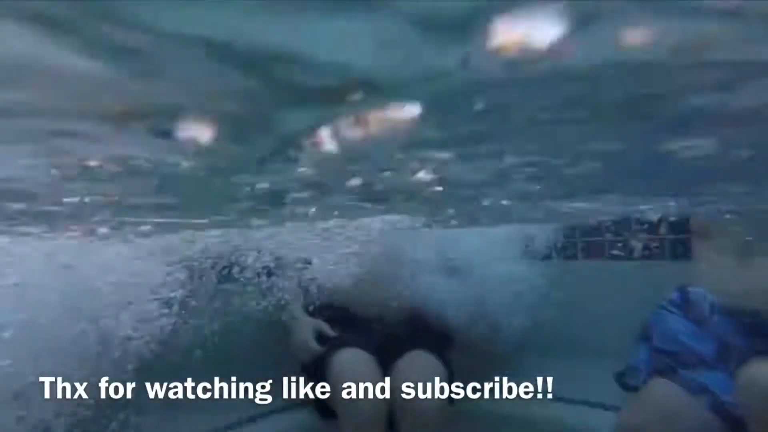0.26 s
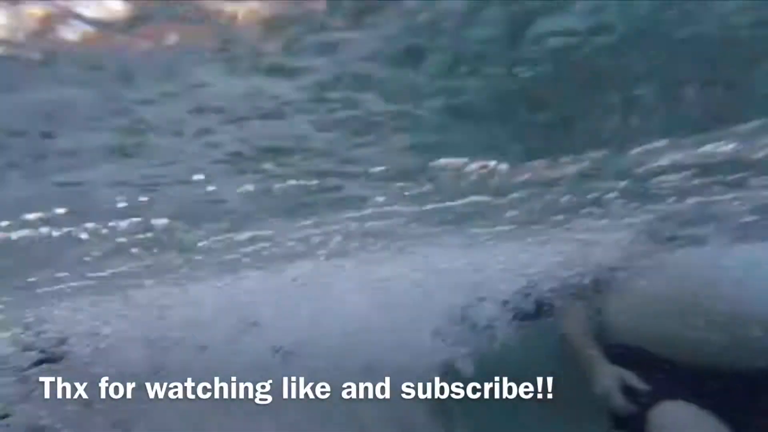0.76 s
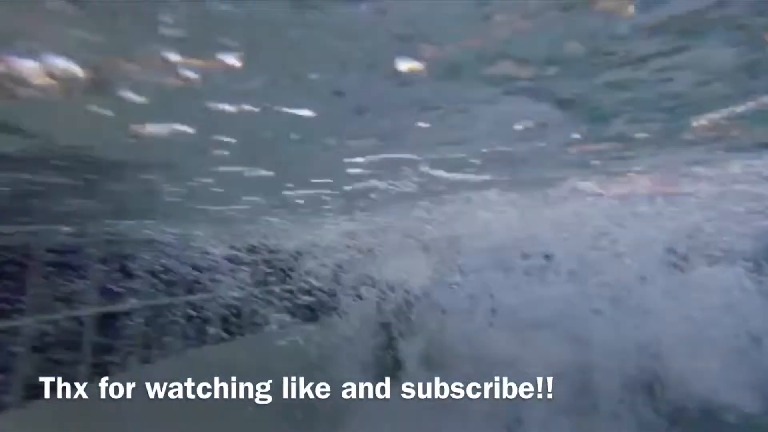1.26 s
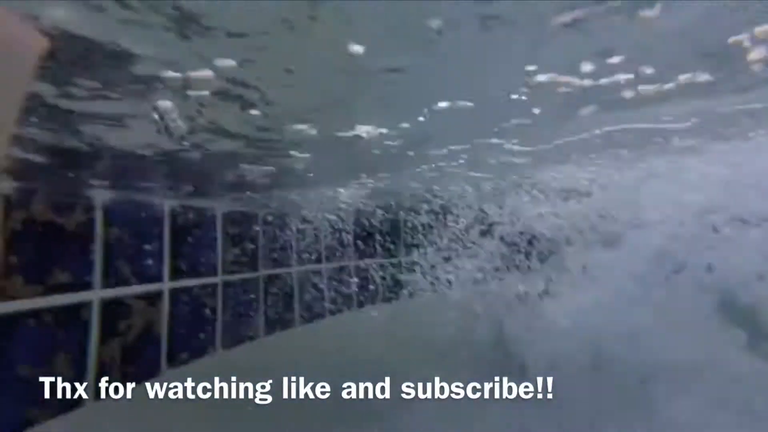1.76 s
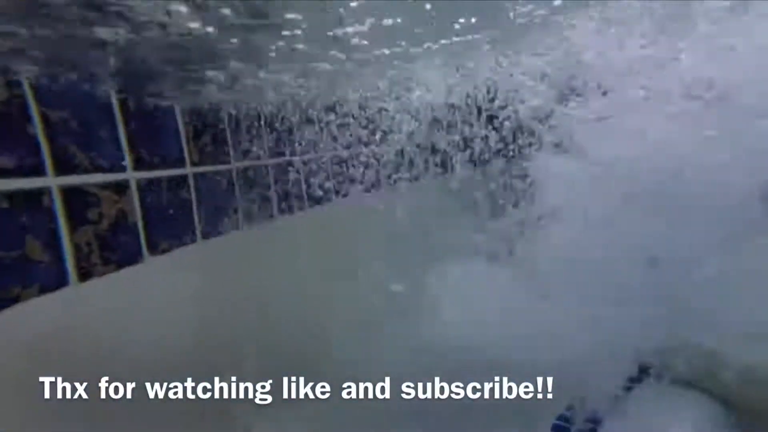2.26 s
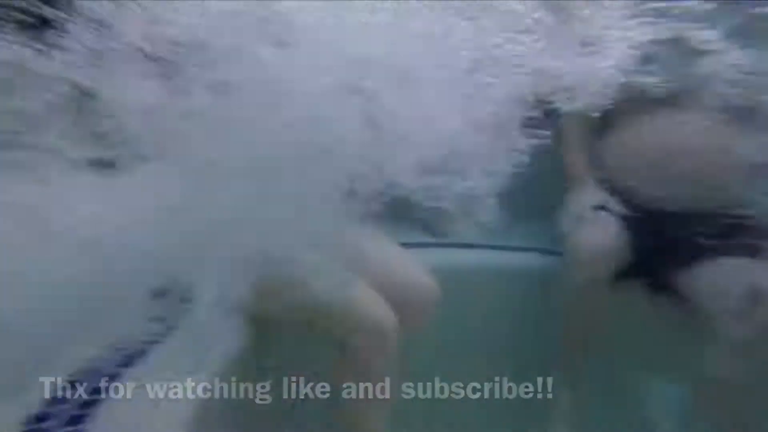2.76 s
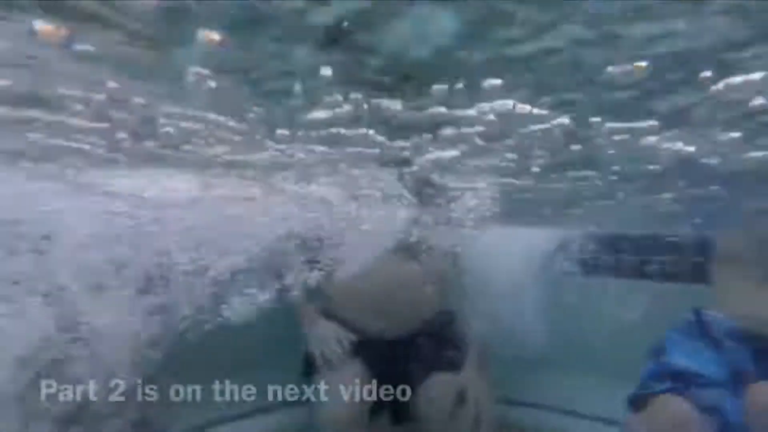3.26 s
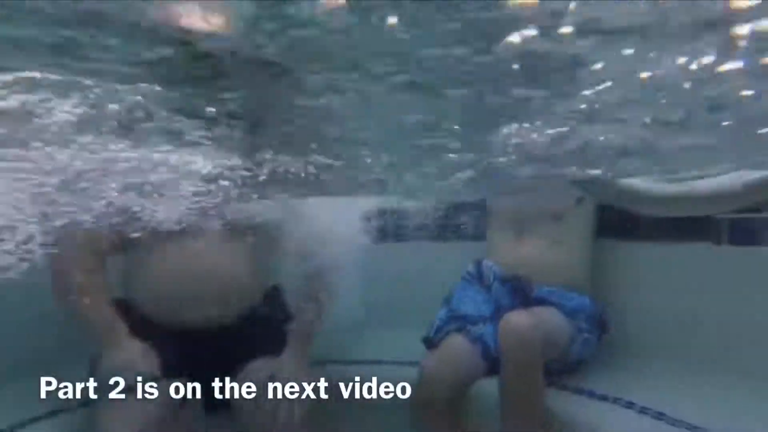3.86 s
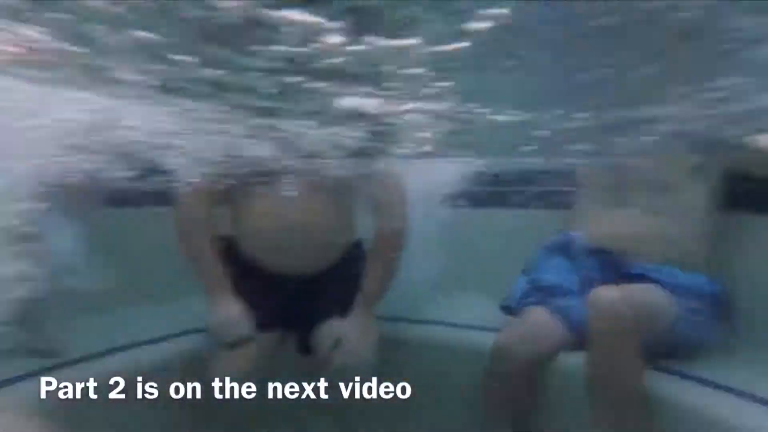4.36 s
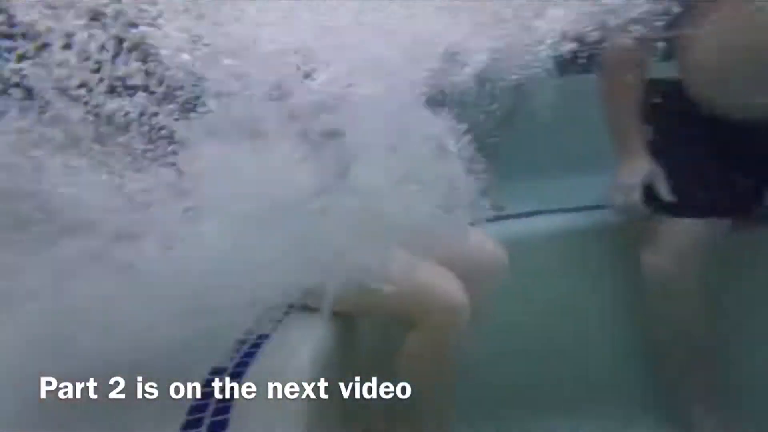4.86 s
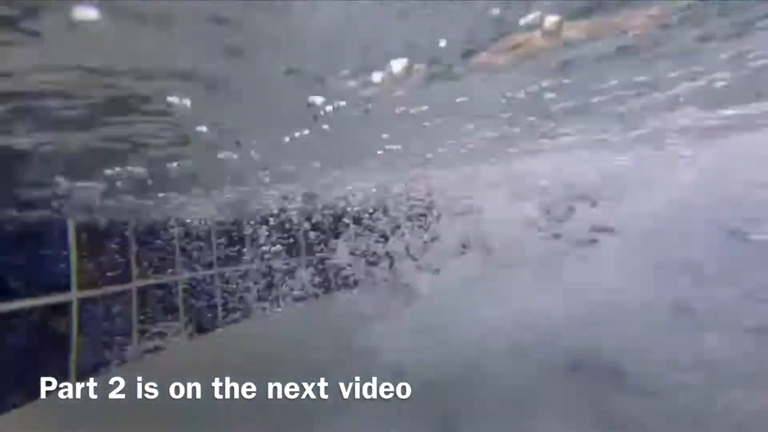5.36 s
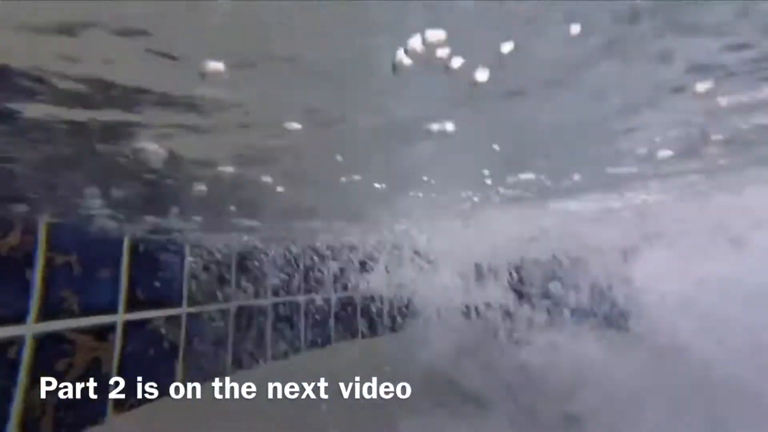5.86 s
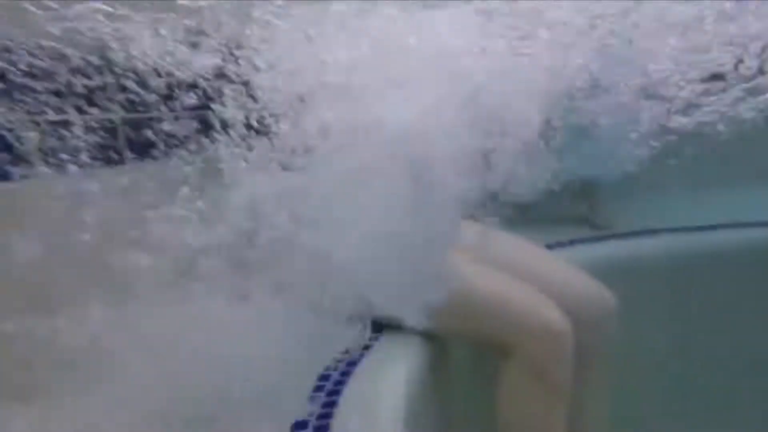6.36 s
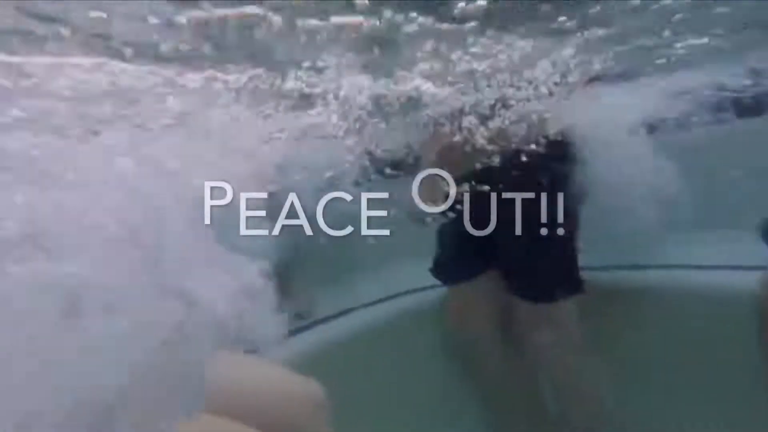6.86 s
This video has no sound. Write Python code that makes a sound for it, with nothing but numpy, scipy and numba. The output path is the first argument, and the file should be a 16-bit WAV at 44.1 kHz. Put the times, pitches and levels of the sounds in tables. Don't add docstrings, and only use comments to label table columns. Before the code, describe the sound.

A microphone plunges with a crackling slap into a hot tub, then hears steady muffled underwater rumble, bubbling churn and small knocks.

```python
import sys
import numpy as np
from scipy import signal
from scipy.fft import rfft, irfft, next_fast_len
from scipy.io import wavfile
from scipy.ndimage import uniform_filter1d, minimum_filter1d
from numba import njit

SR = 44100
rng = np.random.default_rng(int(sys.argv[2]) if len(sys.argv) > 2 else 0)


def linear_from_db(decibels):
    return 10 ** (np.asarray(decibels, float) / 20)


def dump_mix(stems):
    frames = np.atleast_2d(stems).T
    limited = np.clip(frames, -1, 1)
    pcm = np.round(limited * 32767).astype(np.int16)
    wavfile.write(sys.argv[1], SR, pcm)


N = 314342
RING_HZ = 1130.0


def curves(*tables):
    s, *columns = np.vstack(tables).T
    return [np.interp(np.arange(N) / SR, s, c) for c in columns]


def swells(s, db, half_s):
    t = np.arange(0, N + 64, 64) / SR
    bells = db * np.exp(-((t[:, None] - s) / half_s) ** 2)
    return np.interp(np.arange(N) / SR, t, bells.sum(axis=1))


def colour(x, points):
    hz, db = np.transpose(points)
    size = next_fast_len(N)
    f = np.arange(size // 2 + 1) * SR / size + 1
    gain = linear_from_db(np.interp(np.log(f), np.log(hz), db, -140, -140))
    y = irfft(rfft(x, size) * gain, size)[:N]
    return y / np.std(y)


def walk(rate):
    k = int(SR / rate)
    steps = np.repeat(rng.standard_normal(N // 100), k)[:N]
    return 0.81 * uniform_filter1d(uniform_filter1d(steps, k), k)


@njit
def svf(x, hz, width_hz):
    y, b, l = np.empty(len(x)), 0., 0.
    for i in range(len(x)):
        g, k = np.tan(np.pi * hz[i] / SR), width_hz / hz[i]
        v = (b + g * (x[i] - l)) / (1 + g * (g + k))
        b, l, y[i] = 2 * v - b, l + 2 * g * v, k * v
    return y


def fixed_band(x, hz, width_hz):
    return svf(x, np.full(N, hz), width_hz)


@njit
def rings(length, s, hz, t60, size, glide):
    y = np.zeros(length)
    for e in range(len(s)):
        start, n = int(s[e] * SR), int(t60[e] * SR * .8) + 1
        z, swell = size[e] + 0j, 1.
        p = np.exp(2j * np.pi * hz[e] / SR - np.log(1000) / (t60[e] * SR))
        turn = np.exp(2j * np.pi * hz[e] * glide / SR / n)
        for i in range(start, min(start + n, length)):
            y[i] += z.imag * (1 - swell) ** 2
            swell *= 1 - 2 * hz[e] / SR
            z *= p
            p *= turn
    return y


def saturate(x, share):
    envelope = np.abs(signal.hilbert(x, next_fast_len(N))[:N])
    return x / envelope ** share


def under():
    return np.clip((np.arange(N) / SR - 0.195) / 0.012, 0, 1)


# (time [s], churn level [dB], share of the shell wrapped in foam [0-1])
JETS = [(0, -28.5, 0.9), (.2, -33, 0.28), (.32, -29, 0.18), (.7, -27, 0.17), (.9, -33, 0.14),
        (1.36, -28.5, 0.17), (1.6, -26.5, 0.1), (2.3, -19.5, 0.18), (2.64, -25, 0.11), (3.1, -20, 0.16),
        (3.4, -26, 0.11), (3.95, -20, 0.12), (4.47, -25, 0.17), (5.1, -19.5, 0.12), (5.27, -22.5, 0.38),
        (5.45, -18, 0.74), (5.56, -21.5, 0.23), (7.13, -20.5, 0.29)]
# (time [s], rise [dB], half length [s])
GUSHES = [(0.49, -0.5, 0.051), (0.63, 3, 0.041), (0.998, 0.5, 0.043), (1.367, -1.5, 0.049),
          (0.822, 6, 0.063), (1.104, 2.5, 0.031), (1.255, 2.5, 0.033), (1.554, 1.5, 0.029),
          (1.794, 2.5, 0.048), (1.925, -1.5, 0.051), (1.996, 3, 0.031), (2.945, 3.5, 0.05),
          (2.926, 0, 0.018), (3.082, 0.5, 0.032), (3.2, 3, 0.023), (5.417, -2, 0.042), (3.527, 4, 0.042),
          (3.981, 3.5, 0.017), (4.073, -2.5, 0.067), (4.274, 3.5, 0.023), (4.944, 1, 0.093),
          (5.056, -5, 0.061), (5.616, 2.5, 0.075), (5.894, -2.5, 0.096), (6.074, 1.5, 0.071),
          (6.25, 2, 0.026), (6.7, -3, 0.14), (6.756, 4, 0.051), (7.006, 2, 0.039)]
# (offset [dB], share of churn change [1], foam effect [dB per full foam],
# foam share beyond which nothing changes [1], share of gush [1])
FOLLOW = [
    (0, 0.81, -1.95, 1.2, 0.86),
    (5.5, 0.74, -32, 1.2, 1.4),
    (-21, 0.73, 2.5, 1.2, 1.2),
    (-52.5, .4, 4.5, 1.2, .25),
    (-34, 0.67, 55, 0.27, 0.2),
]


def layer_db():
    mid_db = -24
    churn_db, foam = curves(JETS)
    gush_db = swells(*np.transpose(GUSHES))
    return [mid_db + db + share * (churn_db - mid_db) + foam_db * np.minimum(foam, full) + gush * gush_db
            for db, share, foam_db, full, gush in FOLLOW]


# (time [s], rise [dB], half length [s])
LEAKS = [(0.202, 20, .01), (0.227, 7, .02), (0.349, 21, 0.064), (0.443, 13, 0.034), (0.614, 12.5, 0.058),
         (.85, 13, .05), (1.126, 28, .02), (1.547, 20.5, .03), (2.101, 19.5, .02), (3.07, 8, 0.054),
         (3.459, 4, .02), (4.873, 17, 0.01), (4.994, 12, 0.017), (5.114, 6, 0.046), (5.58, 10.5, 0.035),
         (6.081, 7, .025)]
# (time [s], pitch [Hz], level [dB])
PINCH = [
    (5.0, 1350, -70),
    (5.05, 1392, -37.5),
    (5.1, 1433, -38),
    (5.145, 1546, -39),
    (5.18, 1400, -40),
    (5.23, 1340, -68),
]


def pocket():
    grain = rng.standard_normal(N) * linear_from_db(0.9 * walk(44))
    hz, pinch_db = curves(PINCH)
    pinch = svf(svf(grain, hz, 220.), hz, 220.)
    band = colour(grain, [(1330, -19.0), (1420, -0.5), (1520, -6.5), (1650, -10.5), (1800, -26)])
    leak_db = layer_db()[-1] + swells(*np.transpose(LEAKS)) - 5.5
    return linear_from_db(pinch_db) * pinch / np.std(pinch) + band * linear_from_db(leak_db) * under()


# (frequency [Hz], density [dB per Hz])
SPRAY_COLOUR = [(2500, -22), (4000, -17), (5000, -13), (6200, -1.5), (7200, 3.5), (8000, -1), (8800, 1),
                (10500, -5), (10900, -20.5), (11400, -43.5)]
# (frequency [Hz], density [dB per Hz])
SPLASH_COLOUR = [(80, -9.5), (250, 5), (1000, 2), (1600, -10.5), (2500, -10.5), (3500, -26.5), (5000, -53)]
# (start [s], length [s], level [dB], brightness [dB])
SPLASH = [
    (0.151, 0.032, -12, -41),
    (0.184, 0.0053, -18, -45),
    (0.313, 0.087, -28.5, -45),
    (0.386, 0.027, -19, -47),
    (0.762, 0.12, -21.5, -41),
    (0.835, 0.04, -28.5, -34),
    (1.044, 0.087, -28.5, -39),
    (4.224, 0.045, -35, -46),
]


def splash():
    t = np.arange(N) / SR
    grain = rng.standard_normal((2, N)) * linear_from_db(1.9 * walk(400))
    dull, bright = colour(grain[0], SPLASH_COLOUR), colour(grain[1], SPRAY_COLOUR)
    body = signal.sosfiltfilt(signal.butter(2, 900, fs=SR, output="sos"), dull)
    dull = dull - 0.41 * under() * body
    total = np.zeros(N)
    for s, length, db, bright_db in SPLASH:
        burst = np.sin(np.pi * np.clip((t - s) / length, 0, 1) ** 2.0)
        total += burst * linear_from_db(db) * (dull + linear_from_db(bright_db) * bright)
    return total


# (time [s], level [dB])
AIR = [
    (0, -37),
    (.1, -41.5),
    (.15, -38.5),
    (.178, -38),
    (.186, -83.5),
    (.2, -120),
]
# (frequency [Hz], density [dB per Hz])
AIR_COLOUR = [(250, -9), (400, 7.5), (900, -4), (1600, 7.5), (3000, -5), (4300, -11), (5200, -4),
              (7000, -4.5), (8500, -6), (9500, -15.5), (12000, -36.5), (16000, -56)]
# (time [s], pressure jump [full scale], rise [s])
PLUNGE = [(0.145, .4, .0062), (.1585, -.15, .002), (.162, .85, .0025), (.165, -.5, .002), (.1677, .4, .001),
          (.169, -1.1, .0017), (.1707, .6, .001), (.172, .8, .002), (.1745, -.6, .002), (.1773, .7, .001),
          (.1805, -.6, .004), (.1897, -.9, .0012), (.191, .7, .0013), (.1928, -.7, .003)]


def plunge():
    t = np.arange(N) / SR
    fizz = colour(rng.standard_normal(N) * linear_from_db(1.1 * walk(110)), AIR_COLOUR)
    gap = svf(rng.standard_normal(N), np.interp(t, [0, .08, .16], [9000., 9600., 10800.]), 1000.)
    pressure = np.zeros(N)
    for s, jump, rise in PLUNGE:
        pressure += 1.35 * jump * np.sin(np.pi / 2 * np.clip((t - s) / rise, 0, 1)) ** 2
    vent_s = 0.01
    leaked = signal.lfilter([1, -1], [1, -np.exp(-1 / (vent_s * SR))], pressure)
    crack_s, crack_db, crack_t60_s = .1783, -6, .004
    snap = linear_from_db(crack_db - 60 * np.abs(t - crack_s) / crack_t60_s)
    crack = rng.standard_normal(N) * (t > crack_s) * snap
    crack = signal.sosfilt(signal.butter(2, 3000, fs=SR, output="sos"), crack)
    return crack + (fizz + gap) * linear_from_db(curves(AIR)[0]) + leaked


# (time [s], peak [dB], pitch [Hz], ring T60 [s])
KNOCKS = [(0.1406, -9.5, 1050, 0.012), (0.1565, 5.5, 600, 0.007), (.1665, 9, 900, .008),
          (0.1645, -7, 1500, .006), (0.168, -5, 2600, .006), (0.174, -1, 2100, .006),
          (0.178, 9, 1670, 0.0052), (0.186, 4, 1430, 0.013), (0.1877, -1, 1250, 0.0095),
          (0.254, -3.5, 1470, 0.013), (.307, -16, 1290, 0.026), (0.4063, -11, 2260, .012),
          (.409, -8.5, 1350, 0.017), (0.8495, -18, 2000, .012), (1.1174, -16, 1480, .012),
          (1.124, -17, 1850, .008), (1.132, -17, 1660, .009), (1.139, -28, 1900, .008),
          (1.538, -28, 1720, 0.0134), (2.105, -19, 1497, .008), (2.108, -18, 1900, .008),
          (2.811, -21, 2704, 0.01), (2.8366, -12.5, 2560, 0.012), (2.837, -17, 1900, .008),
          (3.19, -24, 2040, 0.013), (3.463, -27, 1500, 0.016), (4.8784, -19, 1546, .017),
          (6.079, -27, 1600, .014)]
# (time [s], peak [dB], pitch [Hz])
BUMPS = [(0.37, -10, 201), (0.4, -10, 209), (0.572, -14, 191), (.655, -25, 170), (0.721, -9.5, 160),
         (0.87, -1, 203), (.97, -21, 193), (1.106, -14, 197.2), (1.134, -12.5, 198), (1.18, -19, 200),
         (2.12, -5, 162), (2.693, -3, 172.5), (3.04, -5.5, 201.5), (3.067, -5.5, 150), (3.172, -21, 194.2),
         (3.78, -18, 183), (4.259, -4.5, 146), (4.293, 1.5, 138), (4.65, -3.5, 145), (5.018, -4.5, 164.3),
         (5.609, -17, 144), (5.938, -11, 148), (6.079, -18, 142), (6.516, -10, 281)]
# (time [s], peak [dB], pitch [Hz])
PINGS = [(0.5004, -12.5, 1200), (0.66, -12.5, 1140), (0.714, -10, 1123), (0.7782, -10.5, 1094),
         (0.8207, -20, 1160), (1.7212, -20, 1097), (1.8634, -16, 1130), (1.907, -14, 1165),
         (1.9646, -14, 1109), (1.997, -14, 1114), (2.1511, -11.5, 1130), (2.2147, -11.5, 1110),
         (2.2631, -15, 1154), (2.3275, -6, 1163), (2.392, -10, 1130), (2.4916, -9.5, 1090),
         (2.5271, -16, 1084), (2.6444, -13, 1140), (2.801, -13, 1130), (2.8675, -15, 1210),
         (2.906, -7.5, 1123), (2.9953, -14, 1130), (3.0786, -12, 1120), (3.1018, -20, 1150),
         (3.178, -16, 1120), (3.2547, -10, 1110), (3.4966, -6, 1130), (3.5753, -11, 1130),
         (3.6974, -6.5, 1113), (3.746, -15, 1111), (4.0696, -11.5, 1130), (4.146, -13, 1130),
         (4.1891, -17.5, 1110), (4.2702, -10, 1090), (4.774, -13.5, 1136), (4.954, -13.5, 1140),
         (5.6443, -11.5, 1034), (5.7833, -14.5, 1130), (5.8724, -18, 1072), (5.9, -9.5, 1064),
         (6.0058, -15.5, 1150), (6.0704, -13.5, 1130), (6.0923, -13, 1070), (6.2594, -17, 1147),
         (6.4231, -14, 1105), (6.465, -15.5, 1123), (6.5167, -17.5, 1084), (6.547, -18, 1150),
         (6.591, -14, 1122), (6.752, -14, 1120), (6.764, -13, 1120), (6.8906, -15, 1120),
         (6.9552, -15.5, 1105), (7.037, -15, 1140)]
# (time [s], peak [dB], pitch [Hz])
TICKS = [(.01, -41, 8800), (.016, -41, 4500), (.132, -43, 8500), (.138, -43, 7500), (.146, -39, 7000),
         (.165, -38, 4500), (.178, -25, 4500), (.1788, -44, 7300), (.192, -51, 8000), (.1578, -30, 3000),
         (.1578, -36, 5000), (.169, -30, 3400), (.1782, -17, 3000), (.1782, -25, 5800), (.203, -37, 3200),
         (.212, -43, 3300), (.2205, -49, 7000), (.221, -45, 3200), (.228, -44, 2700), (.363, -50, 7500),
         (.370, -49, 7000), (.403, -47, 8000), (.4072, -45, 4800), (.4072, -39, 3000), (.825, -48, 3600),
         (.8385, -46, 6200), (.8385, -48, 9000), (.85, -33, 3000), (.85, -39, 4300), (.85, -43, 5800),
         (.856, -49, 7000), (.865, -45, 3800), (1.049, -47, 7500), (1.124, -48, 3900), (1.2906, -48, 7500),
         (1.318, -52, 3600), (2.8375, -50, 3900), (2.911, -55, 4100), (2.911, -56, 5400),
         (2.911, -57, 6800), (3.1, -47, 2700), (3.465, -49, 7500), (4.2932, -46, 3600), (4.2935, -48, 5000)]


def knocks():
    bump_t60_s, ping_t60_s = 0.093, 0.026
    s, db, hz, t60 = np.transpose(KNOCKS + [(*row, bump_t60_s) for row in BUMPS])
    partner_hz = hz * np.where(hz > 1900, .72, 1.45)
    body = rings(N, s, hz, t60, linear_from_db(db), 0.035)
    body = body + rings(N, s, partner_hz, 0.5 * t60, linear_from_db(db - 19.5), 0.027)
    ping_s, ping_db, ping_hz = np.transpose(PINGS)
    pings = rings(N, ping_s, ping_hz, ping_t60_s + 0 * ping_s, linear_from_db(ping_db + 6), 0.02)
    body = body + fixed_band(fixed_band(pings, RING_HZ, 230.), RING_HZ, 230.)
    soft = signal.sosfilt(signal.butter(8, 3000, fs=SR, output="sos"), body)
    blow_tick_db = db - 31 - 2 * np.minimum(t60 * 1000, 22)
    tick_s, bright_db, tick_hz = np.transpose(TICKS)
    s, db = np.append(s, tick_s), np.append(blow_tick_db, bright_db)
    hz = np.append(np.full(len(hz), 4200.), tick_hz)
    ticks = np.zeros(N)
    for r in rng.standard_normal((4, len(s))):
        ticks += rings(N, s + .0005 * np.abs(r), hz * (1 + .08 * r), 18 / hz, linear_from_db(db), 0.)
    tick_band = signal.butter(2, [2500, 10000], "band", fs=SR, output="sos")
    return soft + signal.sosfilt(tick_band, ticks)


def bubbling_churn():
    when, pitch, rank = rng.random((3, 9000))
    hz = 120 * 22 ** pitch
    size = linear_from_db(-2.2 * np.log(np.maximum(rank, .03))) * np.sqrt(hz)
    bubbles = rings(N, when * N / SR, hz, 12 / hz, size, 0.16)
    churn = rng.standard_normal(N) + 0.26 * bubbles / np.std(bubbles)
    return churn * linear_from_db(0.93 * walk(12) + 1.0 * walk(60))


# (frequency [Hz], density [dB per Hz])
BIG_COLOUR = [(70, -33.5), (120, -5.5), (200, -6), (400, -9), (640, -12.5), (830, -8), (1000, -13),
              (1400, -39), (2000, -66.5)]
RING_COLOUR = [(850, -33.5), (1000, -8), (1140, -0.5), (1300, -10), (1410, -22), (1480, -52)]
SMALL_COLOUR = [(1450, -41.5), (1700, -3.5), (2000, -2), (2240, 4), (2450, -7.5), (2800, -7.5), (3050, -20),
                (3500, -31), (4500, -53)]
# (time [s], change [dB], half length [s])
BIG_CHANGES = [(0.28, -3, 0.035), (.5, -6.5, 0.064), (0.646, 6, 0.033), (0.829, 4, .05), (.94, -2.5, .05),
               (1.1, 0, .03), (1.3, -6.5, 0.12), (2.029, -2, 0.048), (2.355, 0.5, 0.046), (2.5, -1.5, 0.16),
               (2.925, -2.5, 0.071), (3.087, 3.5, .03), (3.18, 3, 0.023), (3.493, -2.5, 0.055),
               (3.628, -2.5, 0.045), (3.72, 1, .04), (3.998, 0.5, 0.052), (4.287, 4, 0.045), (4.602, 1.5, 0.071),
               (4.851, -1, 0.057), (5.203, 1, .08), (5.61, 2, 0.074), (6.076, 1.5, 0.032), (6.2, 1.5, .05),
               (6.3, 1.5, 0.06), (6.897, 2.5, 0.063), (7.05, 2, .06)]


def jets():
    big_db, ring_db, small_db, spray_db, _ = layer_db()
    foam = curves(JETS)[1]
    churn = bubbling_churn()
    big = colour(churn * linear_from_db(1.4 * walk(15)), BIG_COLOUR)
    big = big * linear_from_db(big_db + 0.5 + swells(*np.transpose(BIG_CHANGES)))
    big = big - np.clip(foam * 1.9, 0, .75) * fixed_band(big, RING_HZ, 600.)

    ring = colour(churn * linear_from_db(0.38 * walk(68)), RING_COLOUR)
    ring = colour(saturate(ring, 0.16), [(850, -20.5), (950, -2.5), (1350, 2.5), (1450, -23.0)])
    ring = ring * linear_from_db(ring_db - 2.5)
    ping_s, lull_s = np.transpose(PINGS)[0], 0.0055
    ring = ring * linear_from_db(swells(ping_s - lull_s, -1.5, lull_s) + swells(ping_s + lull_s, -2, lull_s))
    ring = ring - np.clip((foam - .15) * 6., 0, .55) * fixed_band(ring, 1330., 260.)

    small = colour(churn * linear_from_db(2.0 * walk(22)), SMALL_COLOUR) * linear_from_db(small_db + 2.5)
    spray = colour(rng.standard_normal(N) * linear_from_db(1.2 * walk(40) + 2.5 * walk(300)), SPRAY_COLOUR)
    spray = spray * linear_from_db(spray_db + 2.5)
    return big + (ring + small + spray) * under()


# (time [s], breathing pitch [Hz], hum level [dB])
CLOUD = [
    [(0, 78.6, -45), (.08, 90, -25), (.24, 86.7, -41)],
    [(.47, 72.13, -12.5), (.83, 77, -17.5), (1.25, 85.42, -16.5), (1.75, 77.58, -11.5), (2.1, 78.92, -12.5),
     (2.55, 76.95, -11), (2.9, 85.4, -12.5), (3.35, 70.7, -11.5), (3.65, 76.38, -11), (4.2, 91.9, -10),
     (4.65, 78.04, -11.5), (5.7, 82.37, -11), (6.05, 71.07, -10), (6.45, 79.94, -10), (6.95, 75, -9.5)],
]
# (time [s], pitch change [Hz], half length [s])
WAVERS = [(0.931, 7, 0.0895), (2.055, -14, 0.0605), (2.217, 3, 0.063), (2.703, 3, 0.059), (3.996, 3, .05),
          (4.28, -8, 0.049), (4.42, 4, 0.057), (4.646, -3, .05), (4.994, 2, .05), (5.28, -3, 0.077),
          (5.496, 4, 0.086), (5.878, -4, 0.059), (6.151, 8, 0.049), (6.747, -6.5, .05), (7.0, 5, 0.13)]
# (time [s], change [dB])
THROBS = [(.43, -6.5), (0.811, 9), (.93, -18), (1.12, -21), (1.52, 1.5), (1.74, -1.5), (2.0, -7), (2.19, 4),
          (2.3, 2), (2.39, -5), (2.58, 1.5), (2.71, -20), (3.04, -7.5), (3.17, -2.5), (3.5, 4), (3.56, 1.5),
          (3.62, 3), (3.731, -11), (4.29, -1), (4.351, -12), (4.43, -9), (4.61, -2), (4.53, 2), (4.71, 1.5),
          (4.89, -5), (5.05, -4.5), (5.12, -0.5), (5.34, 2.5), (5.66, 2.5), (5.7, 2), (5.77, -1.5),
          (5.85, -6), (5.94, -18.5), (6.07, 0.5), (6.22, -3.5), (6.33, -7), (6.401, -1.5), (6.679, -14.5),
          (6.87, -5.5)]
# (time [s], rise over the calm level [dB], half length [s])
SURGES = [(0.048, 11.5, 0.041), (0.195, 7, 0.056), (0.445, 11.5, 0.075), (0.64, 12.5, 0.094),
          (0.774, 6, 0.068), (0.855, 22, 0.038), (1.126, 17, 0.034), (1.47, 8.5, 0.3), (1.868, 7, 0.047),
          (2.07, 10, 0.089), (2.298, 7, 0.12), (2.747, 10.5, 0.099), (2.996, 14.5, 0.084),
          (3.203, 15, 0.091), (3.625, 9.5, .04), (4.678, 6, 0.046), (5.699, 3.5, 0.038),
          (3.795, 14.5, 0.081), (3.931, 15, 0.05), (4.156, 9.5, 0.13), (4.873, 8, 0.07), (5.076, 10, 0.16),
          (5.482, 8.5, 0.13), (5.621, 6.5, 0.06), (5.85, 17, 0.054), (5.956, 13, 0.045), (6.333, 6, 0.066),
          (6.737, 11, 0.12), (7.07, 16.5, 0.055)]


def cloud():
    throb_s, calm_db = 0.025, -26.5
    hz, hum_db = curves(*CLOUD)
    hz = hz + swells(*np.transpose(WAVERS))
    hum_db = hum_db + swells(*np.transpose(THROBS), throb_s)
    surge_db = calm_db + swells(*np.transpose(SURGES))
    hum = svf(svf(rng.standard_normal(N), hz, 25.0), hz, 31.0)
    tone = np.sin(2 * np.pi * np.cumsum(hz + 1.4 * walk(14)) / SR) * linear_from_db(3.2 * walk(11))
    hum = saturate(hum / np.std(hum) + 0.85 * tone, 0.42)
    surge = colour(rng.standard_normal(N),
                   [(6, -12.5), (18, -8.0), (30, -7.5), (50, -2.5), (65, -8.0), (95, -26.5)])
    return linear_from_db(hum_db) * hum / np.std(hum) + linear_from_db(surge_db) * surge


def scene():
    return (pocket() + splash() + plunge() + knocks() + jets() + cloud())[None]


@njit
def hold(x, top, attack, release):
    gain, e = np.empty(len(x)), 0.
    for i in range(len(x)):
        e += (abs(x[i]) - e) * (attack if abs(x[i]) > e else release)
        gain[i] = min(1., top / (e + 1e-9))
    return gain


def smooth(gain):
    return uniform_filter1d(uniform_filter1d(gain, size=300), size=300)


def band_limit(x):
    return signal.sosfilt(signal.butter(12, 15000, fs=SR, output="sos"), x)


def record(dry):
    held = dry[0] * smooth(hold(dry[0], 0.59, 0.016, 0.00044))
    room = minimum_filter1d(np.minimum(1, .96 / (np.abs(held) + 1e-9)), size=600)
    limited = held * smooth(room)
    i = np.arange(N)
    limited = limited * np.clip(np.minimum(N - i, 3 * i) / (.006 * SR), 0, 1)
    return band_limit(limited[None])


dry = scene()
out = record(dry)
dump_mix(out)
```